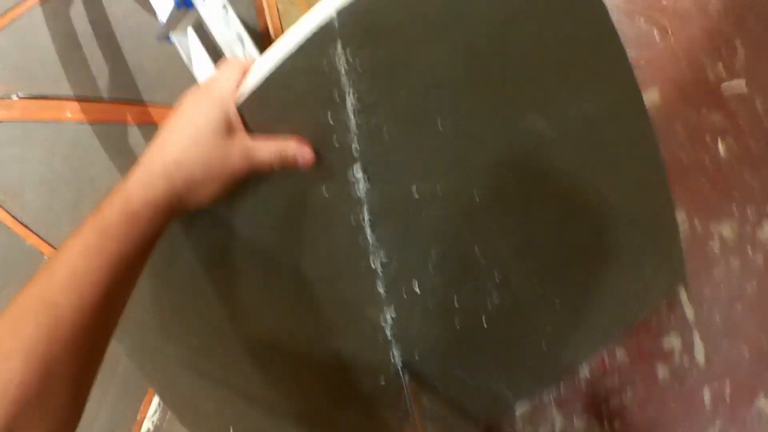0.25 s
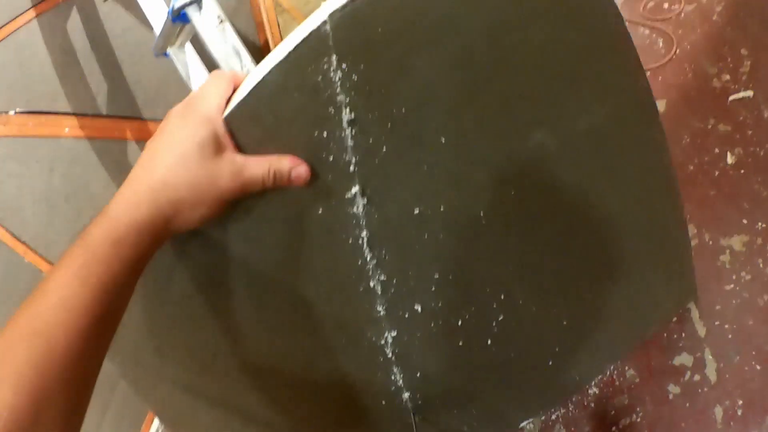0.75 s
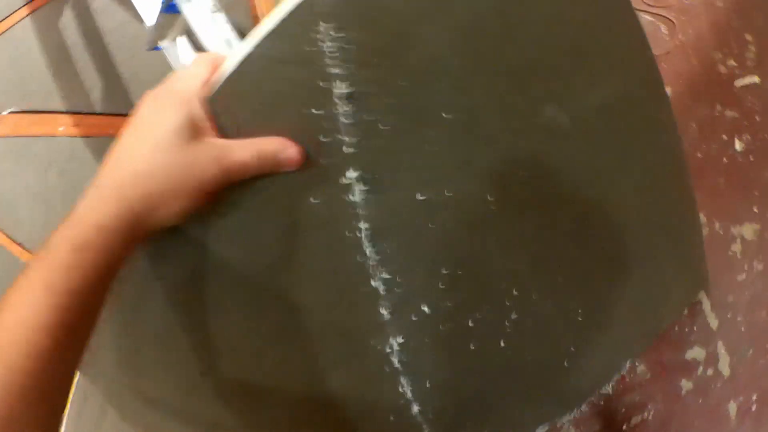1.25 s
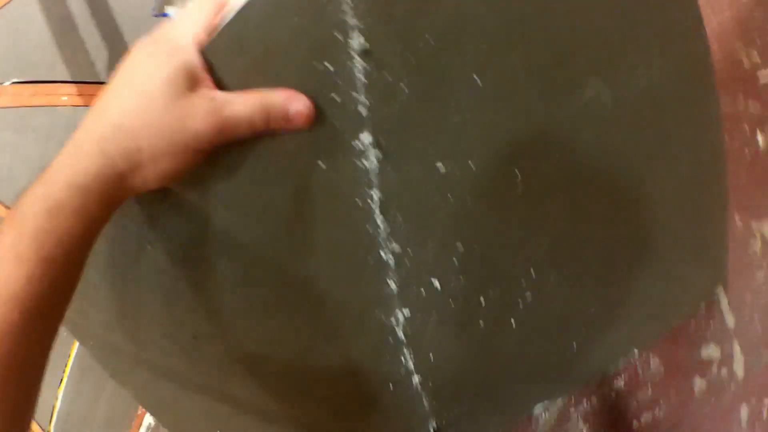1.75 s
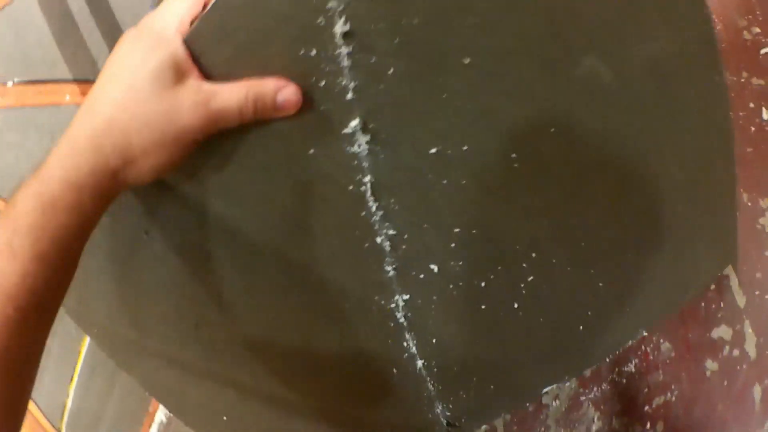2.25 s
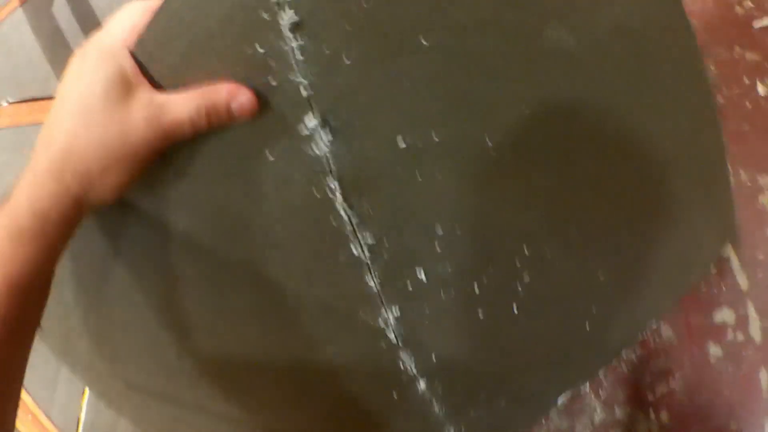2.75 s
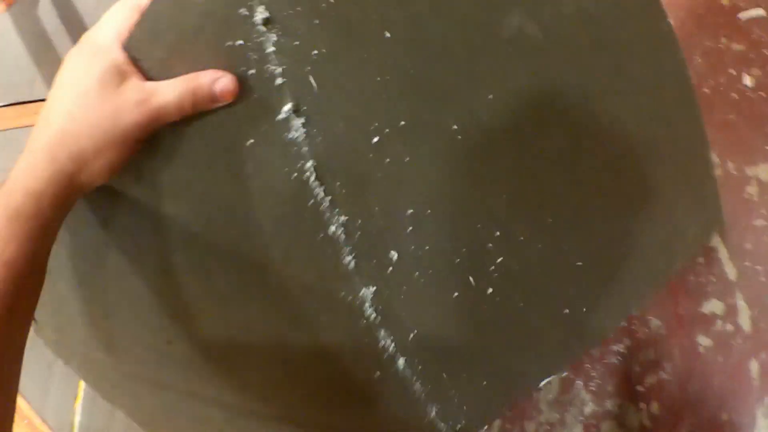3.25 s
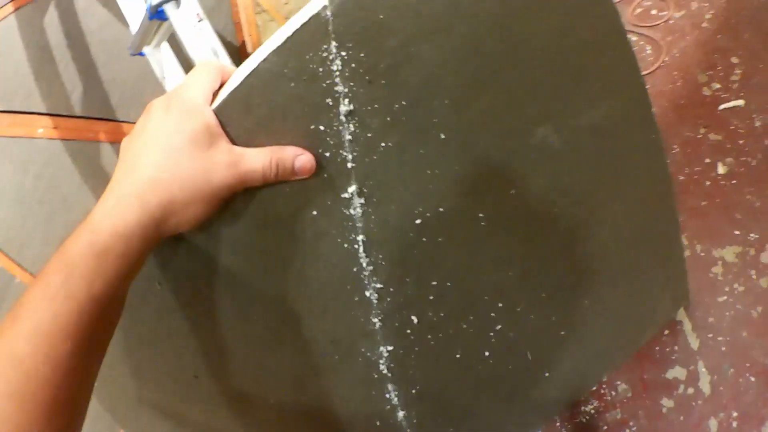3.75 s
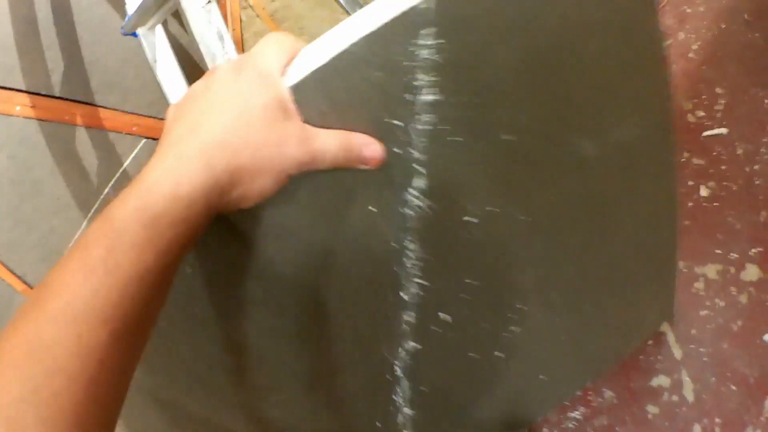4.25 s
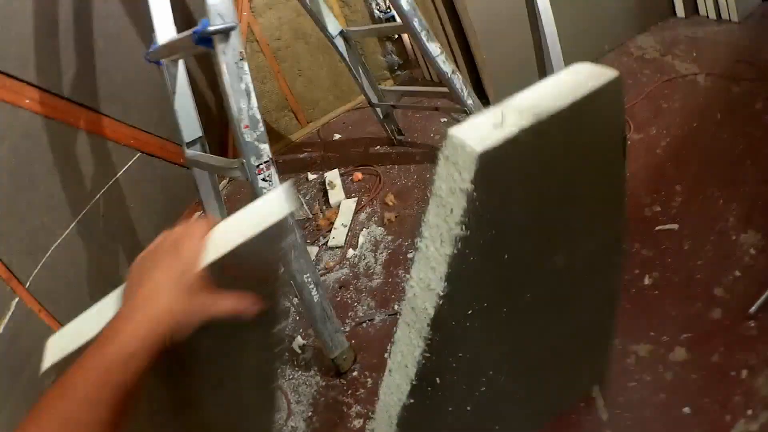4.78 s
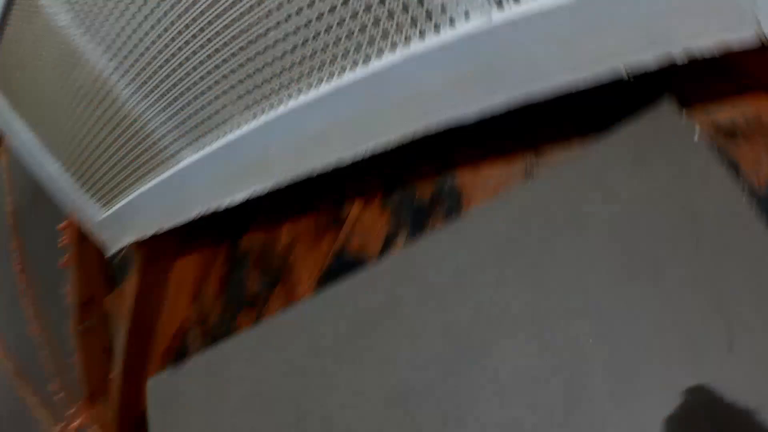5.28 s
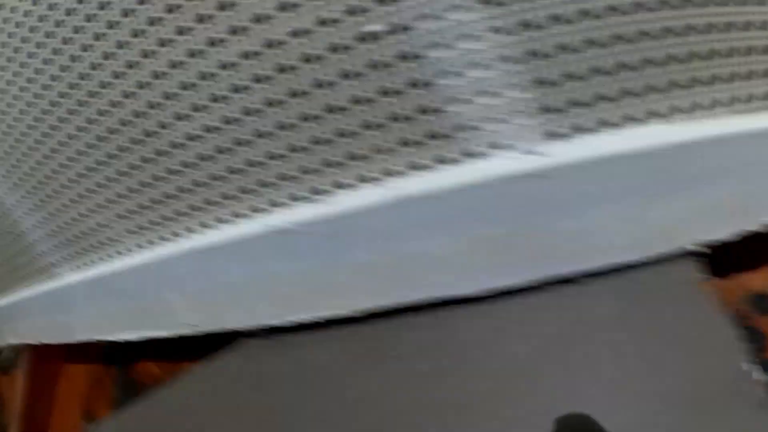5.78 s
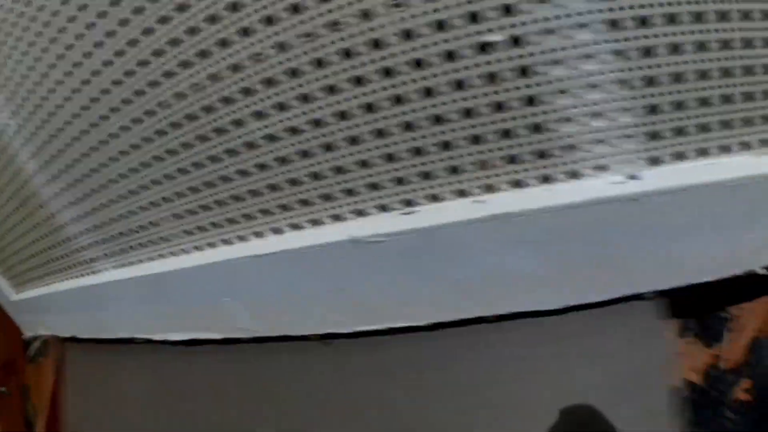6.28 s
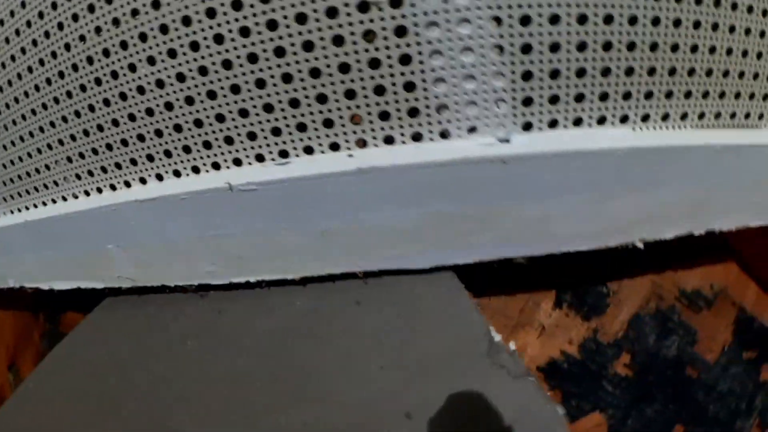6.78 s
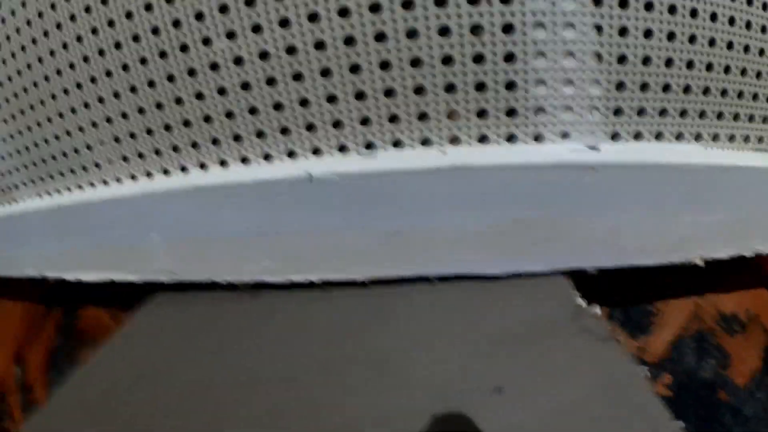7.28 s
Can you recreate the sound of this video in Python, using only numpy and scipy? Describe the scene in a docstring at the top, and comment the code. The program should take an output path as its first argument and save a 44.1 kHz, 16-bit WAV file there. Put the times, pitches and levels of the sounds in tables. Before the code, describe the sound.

A serrated blade saws quickly through rigid foam board, droning and squeaking, then a crack, a knife clattering down, and rough foam rasping over hum.

```python
"""A serrated knife saws through rigid foam board: the teeth crush cells, the sheet drones, the blade squeaks.
Sawing, parting and rasping are friction, as noise in three bands driven by hand speed and pressure.
Teeth add a periodic tone and squeaks are gliding sines; cracks of the board are bursts of dying noise.
The halves rub apart, the knife clatters on the floor as ringing modes, clink noise and thump noise.
Then foam is rasped in rough strokes of uneven length over a low mains hum, in a small hard workshop."""
import sys
import numpy as np
from scipy import signal
from scipy.fft import rfft, irfft, next_fast_len
from scipy.io import wavfile
from scipy.ndimage import uniform_filter1d

SR = 44100
rng = np.random.default_rng(int(sys.argv[2]) if len(sys.argv) > 2 else 0)


def bounce(signal):
    """Save signal as a 16-bit WAV file at the path given by the first command-line argument."""
    frames = np.transpose(np.atleast_2d(signal))
    limited = np.clip(frames, -1, 1)
    pcm = np.round(limited * 32767).astype(np.int16)
    wavfile.write(sys.argv[1], SR, pcm)


N = 331632
T = np.arange(N) / SR   # time of each sample [s]

# Saw strokes, push and pull in turn; levels are nominal, the tooth tone's at mid-stroke:
# (start [s], pressure peak [s], end [s], sheet drone [dB], rasp [dB], hiss [dB],
#  mid-stroke tooth rate [teeth/s], tooth tone [dB])
SAW_STROKES = [(-0.069, 0.06, 0.17, -24.5, -23, -29.5, 588.0, -22.0),
               (0.176, 0.332, 0.38, -27.5, -27.0, -28.5, 560.0, -33.5),
               (0.355, 0.44, 0.56, -24, -23.0, -30.5, 520, -19),
               (0.569, 0.733, 0.78, -32, -27.5, -30.5, 450.0, -44),
               (0.766, 0.826, 1.012, -23.5, -23, -27, 605, -25),
               (1.015, 1.084, 1.203, -32.5, -23.0, -24.0, 400.0, -44),
               (1.2, 1.304, 1.425, -26.0, -23.0, -24, 320.0, -32),
               (1.424, 1.566, 1.63, -32.5, -21.5, -25, 420, -45),
               (1.632, 1.735, 1.852, -23.5, -24.5, -29.5, 352, -24),
               (1.878, 2.038, 2.06, -25.5, -24, -27, 580, -42.0),
               (2.049, 2.114, 2.3, -22.5, -24.0, -29.5, 430.0, -28),
               (2.302, 2.443, 2.474, -36.0, -21.5, -27.5, 400.0, -46.5),
               (2.475, 2.529, 2.722, -27.5, -24, -26, 284, -41.5),
               (2.718, 2.745, 2.97, -35.0, -28, -26, 265, -46.0),
               (2.985, 3.106, 3.164, -26.5, -27.5, -30, 230, -31.5)]
# Response of drone, rasp and hiss, a row each: (power of the speed [-], rise under full pressure [dB])
SAW_RESPONSE = [(0.81, 10.5), (0.56, 7.5), (0.69, -3)]
# Spectrum of sawing: (frequency [Hz], relative density [dB per Hz])
SAW_SPECTRUM = [(30, -53), (70, -15.5), (120, -16), (182, 2), (225, -10), (305, -0.5), (490, -9.5),
                (630, -7), (760, -12), (1300, -11), (1800, -14.5), (2500, -7.5), (3300, -2), (4300, -8),
                (5800, -15), (7300, -4.5), (9000, -2.5), (13200, -27)]


def sawing():
    """Periodic forcing: each passing tooth crushes cells and plucks the sheet."""
    teeth, tone = blade_motion()
    unsteady_teeth = teeth * (1 + .06 * drift(300))
    phase = 2 * np.pi * np.cumsum(unsteady_teeth) / SR
    force = crumbling(grain_db=1.8, clump_db=1.3) * (1 + .2 * np.cos(phase))
    cut = rubbing(SAW_STROKES, SAW_RESPONSE, SAW_SPECTRUM, force, drone_db=0, rasp_db=.5, hiss_db=-1.23)
    # a short echo, randomly wandering in delay and strength, colours the cut
    delayed = T - .0011 * from_db(1.2 * drift(6))
    echo = np.array([np.interp(delayed, T, ear) for ear in cut])
    cut = cut + .35 * np.tanh(2 * drift(3)) * echo
    pluck_wave = np.sin(phase) + 0.17 * np.sin(2 * phase)
    pluck = tone * from_db(2.8 * drift(120)) * pluck_wave
    return cut + pluck * from_db([[-.8], [.8]])   # the pluck leans to the right


IDLE_TEETH_PER_S = 170


def blade_motion():
    """Kinematics: tooth rate follows the stroke's squared speed; the tone gain also favours early bite."""
    teeth, tone = np.full(N, float(IDLE_TEETH_PER_S)), np.zeros(N)
    for start, _, end, *_, top_rate, level_db in SAW_STROKES:
        span = slice(*np.searchsorted(T, [start, end]))
        bite = stroke_speed(T[span], start, end) ** 2
        teeth[span] += (top_rate - IDLE_TEETH_PER_S) * bite
        early = 2 * (end - T[span]) / (end - start)
        tone[span] += from_db(level_db) * bite * early
    return teeth, tone


def stroke_speed(t, start, end):
    """Reciprocating motion: the hand speeds up from rest and slows to rest again, 0-1."""
    arc = np.sin(np.pi * (t - start) / (end - start))
    return np.maximum(arc, 0) * (t > start) * (t < end)


TURN_S = .012   # the foam flexes, so a stroke takes hold and lets go gradually


def stroke_gains(strokes, law):
    """Friction law: drone, rasp and hiss grow with speed and answer a pressure that peaks and eases off."""
    power = np.zeros((3, N))
    for start, peak, end, *levels in strokes:
        span = slice(*np.searchsorted(T, [start, end]))
        speed = stroke_speed(T[span], start, end)
        slack = np.interp(T[span], [start, peak, end], [1, 0, 1])
        for k, (speed_power, pressure_db) in enumerate(law):
            gain = speed ** abs(speed_power) * from_db(levels[k] - pressure_db * slack)
            power[k, span] += gain ** 2
    return uniform_filter1d(np.sqrt(power), int(TURN_S * SR) + 1, axis=1)


def rubbing(strokes, law, spectrum, force, drone_db, rasp_db, hiss_db):
    """Friction noise: bursting cells shake the sheet (low), rasp in the cut (middle) and hiss (high)."""
    edges_hz = (40, 900, 5500, 20000)
    gains, trims_db = stroke_gains(strokes, law), (drone_db, rasp_db, hiss_db)
    bands = zip(edges_hz, edges_hz[1:])
    return sum(gain * from_db(trim_db) * coloured(spectrum, force, band)
               for gain, trim_db, band in zip(gains, trims_db, bands))


def crumbling(grain_db, clump_db):
    """Random fracture: foam cells give way one by one, and in clumps."""
    return from_db(grain_db * drift(2500) + clump_db * drift(130))


# The loudest squeaks of the blade; each ear's level varies a little:
# (start [s], end [s], start pitch [Hz], end pitch [Hz], nominal level [dB])
LOUD_SQUEAKS = [(.40, .436, 9800, 9850, -22), (.51, .555, 7500, 8370, -22.5), (.722, .762, 8300, 9330, -22),
                (1.05, 1.17, 10250, 9700, -26), (1.09, 1.175, 7150, 7300, -23),
                (1.28, 1.39, 9300, 8230, -26), (1.455, 1.50, 8300, 9200, -22),
                (1.66, 1.725, 10800, 11600, -24), (1.80, 1.84, 9200, 8200, -24.5),
                (1.92, 1.985, 11100, 12540, -30), (1.93, 1.99, 7400, 7730, -20),
                (2.60, 2.69, 6860, 7300, -19), (2.635, 2.68, 8330, 8590, -22.5),
                (2.765, 2.825, 6500, 8500, -20.5), (2.798, 2.829, 8780, 9120, -9.5),
                (2.825, 2.965, 8320, 8630, -19), (3.005, 3.06, 7470, 7560, -19.5),
                (3.015, 3.048, 8664, 8900, -17)]


def loud_squeaks():
    """Stick-slip vibration at its strongest: the listed glides of the blade."""
    return squeaks(LOUD_SQUEAKS, waver=.009, flutter_db=2.5)


def squeaks(rows, waver, flutter_db):
    """Stick-slip: steel alternately grips and slides on foam in short, unsteady glides."""
    out = np.zeros((2, N))
    wobble, flutter = 1 + waver * drift(1100), from_db(flutter_db * drift(250))
    for start, end, from_hz, to_hz, level_db in rows:
        span = slice(int(start * SR), int(end * SR))
        u = (T[span] - start) / (end - start)
        pitch = from_hz + (to_hz - from_hz) * np.sin(np.pi * u / 2)
        # each glide reaches the two ears with its own phase and strength
        phase = 2 * np.pi * np.cumsum(pitch * wobble[span]) / SR + rng.normal(0, .8, (2, 1))
        ear_gain = from_db(level_db + rng.normal(0, .8, (2, 1)))
        swell = np.sin(np.pi * u)
        out[:, span] += ear_gain * swell * flutter[span] * np.sin(phase)
    return out


SQUEAK_LOW_HZ, SQUEAK_HIGH_HZ = 6950, 12300   # pitch range at full speed
SQUEAK_S = 0.046   # typical length; each lasts 0.5 to 1.5 times this, at most half the stroke
SQUEAK_FOLLOWS = 0.15   # power of the speed that the pitch follows
SQUEAK_DB, SQUEAK_SPREAD_DB = 2.5, 6   # the strongest, over hiss plus half the spectrum; range below that


def stray_squeaks(count):
    """Speed-dependent stick-slip: rows of faint squeaks whose end pitches follow the blade's speed."""
    rows = []
    for start, _, end, _, _, hiss_db, *_ in SAW_STROKES:
        for when, length, pitch, weakness in rng.random((count, 4)):
            lasts = min(SQUEAK_S * (.5 + length), (end - start) / 2)
            onset = start + (end - start - lasts) * (.08 + .84 * when)
            times = np.array([onset, onset + lasts])
            full_speed_hz = SQUEAK_LOW_HZ * (SQUEAK_HIGH_HZ / SQUEAK_LOW_HZ) ** pitch
            hz = full_speed_hz * stroke_speed(times, start, end) ** SQUEAK_FOLLOWS
            level_db = hiss_db + SQUEAK_DB - SQUEAK_SPREAD_DB * weakness
            level_db += at_hz(SAW_SPECTRUM, hz.mean()) / 2
            rows.append((*times, *hz, level_db))
    return rows


# The cut faces rub apart, nominal levels:
# (start [s], pressure peak [s], end [s], sheet drone [dB], rasp [dB], hiss [dB])
PARTING_STROKES = [(3.206, 3.305, 3.335, -44, -28.5, -40.5), (3.345, 3.412, 3.464, -38.5, -35, -33.5),
                   (3.894, 3.925, 4.05, -44, -39, -36.5), (4.015, 4.151, 4.34, -39.5, -34, -39.5),
                   (4.311, 4.395, 4.456, -37, -29, -37), (4.414, 4.455, 4.58, -55, -46.5, -49),
                   (4.555, 4.63, 4.91, -59, -37, -36.5)]
# Response of drone, rasp and hiss, a row each: (power of the speed [-], rise under full pressure [dB])
PARTING_RESPONSE = [(0.58, 7.8), (0.44, 5), (0.47, 6.9)]
# Spectrum of parting: (frequency [Hz], relative density [dB per Hz])
PARTING_SPECTRUM = [(59, -45), (100, -19.5), (284, -4), (348, -12.5), (513, -8), (643, -17), (805, -8.5),
                    (1900, -10), (2860, 1), (5730, -8), (9160, 5.5), (13200, -21.5)]


def parting():
    """Sliding friction: the cut faces rub apart, foam on foam."""
    force = crumbling(grain_db=1.0, clump_db=1.2)
    return rubbing(PARTING_STROKES, PARTING_RESPONSE, PARTING_SPECTRUM, force,
                   drone_db=0.1, rasp_db=0.34, hiss_db=0.8)


# Rough rasping strokes as overlapping swells of friction, nominal levels:
# (start [s], pressure peak [s], end [s], sheet drone [dB], rasp [dB], hiss [dB])
RASPING_STROKES = [(5.354, 5.385, 5.436, -46.5, -31.5, -42), (5.40, 5.49, 5.56, -46, -34.5, -44),
                   (5.556, 5.595, 5.72, -30, -20.5, -25), (5.678, 5.732, 5.785, -29, -24, -28),
                   (5.749, 5.801, 5.905, -36, -37, -41), (5.925, 6.048, 6.108, -32, -24.5, -30.5),
                   (6.066, 6.085, 6.19, -25, -12.5, -25), (6.116, 6.311, 6.36, -33.5, -22.5, -28),
                   (6.401, 6.445, 6.57, -28.5, -15.5, -21.5), (6.49, 6.59, 6.80, -26, -14, -19.5),
                   (6.747, 6.87, 6.99, -32, -20, -26), (6.937, 7.088, 7.118, -30.5, -15.5, -25.5),
                   (7.222, 7.385, 7.463, -25.5, -10.5, -17.3), (7.494, 7.53, 7.62, -29, -14, -21)]
# Response of drone, rasp and hiss, a row each: (power of the speed [-], rise under full pressure [dB])
RASPING_RESPONSE = [(.41, 1.8), (.45, 8), (.59, 6.7)]
# Spectrum of rasping: (frequency [Hz], relative density [dB per Hz])
RASPING_SPECTRUM = [(60, -33), (120, -14.5), (200, -6), (300, -4.5), (600, -5.5), (1200, -6.5),
                    (2300, -3.5), (3300, -1), (4300, -3.5), (5900, -13), (7300, -5.5), (9000, -5.5),
                    (10400, -13), (14000, -37)]


def rasping():
    """Abrasive friction: foam is rasped in rough strokes of uneven length."""
    force = crumbling(grain_db=1.0, clump_db=1.0)
    return rubbing(RASPING_STROKES, RASPING_RESPONSE, RASPING_SPECTRUM, force,
                   drone_db=-0.4, rasp_db=0.38, hiss_db=1.1)


# Cracks and knocks of the board, and a small click at 5.318 s:
# (time [s], burst level before dulling [dB], dulling cutoff [Hz], thump level [dB])
CRACKS_AND_CLICK = [(3.118, 1.5, 8500, -22), (3.477, -15, 2530, -49), (4.199, -23, 3970, -33.5),
                    (4.4, -20, 4070, -58), (4.868, -22, 2488, -53), (5.318, -29, 6030, -40),
                    (6.078, -7, 8000, -20), (6.971, -10, 9000, -46)]
# Spectrum of the bursts: (frequency [Hz], relative density [dB per Hz])
CRACK_SPECTRUM = [(30, -40), (120, -30), (400, -14), (800, -0.5), (1500, -2), (2800, 2), (4200, -3),
                  (5800, -21.5), (8000, 3), (14000, -18.5)]


def cracks_and_click(crack_t60, thump_t60, tail_db, tail_t60):
    """Impulsive excitation: each row is a short noise burst, a low thump and a duller, lingering wash."""
    burst = coloured(CRACK_SPECTRUM)
    thump = coloured([(30, -17), (170, 4), (350, 3), (900, -33), (4000, -64)], band=(70, SR))
    wash = from_db(tail_db) * lowpass(coloured(CRACK_SPECTRUM), 4200)
    out = np.zeros((2, N))
    for s, level_db, dull_hz, thump_db in CRACKS_AND_CLICK:
        noise = burst * dying(s, crack_t60) + wash * dying(s, tail_t60)
        out += from_db(level_db) * lowpass(noise, dull_hz)
        out += from_db(thump_db) * thump * dying(s, thump_t60)
    return out


# The loose half knocks against something hard: (time [s], level [dB], brightness [dB])
KNOCKS = [(3.477, -22.5, 3.3), (3.488, -27, -3)]
# Its ring: (frequency [Hz], relative level [dB], 60 dB decay time [s])
KNOCK_RING = [(570, 1, .06), (813, -2, .05), (1276, -6, .05), (2143, -4, .07), (3000, -10, .05),
              (4150, -7, .04), (1480, -14, .3)]


def knocking():
    """Modal excitation: the loose half of the board rings as it knocks against something hard."""
    return struck(KNOCKS, KNOCK_RING, spread_db=3.0)


# The knife bounces on the floor: (time [s], relative strength [dB], brightness [dB])
KNIFE_BOUNCES = [(4.906, -12.5, 5), (4.94, -6.5, -5), (4.95, -8, -4), (4.981, -19.5, -11),
                 (5.0287, -26, -1), (5.051, -16, 5), (5.0593, -14, 5), (5.1221, -21, 1), (5.1982, -27, -1),
                 (5.224, -28, -4.5)]
# Ring of the blade: (frequency [Hz], relative level [dB], 60 dB decay time [s])
BLADE_RING = [(1440, -22, .22), (2121, -22, .3), (2454, -1, .13), (2646, -7, .2), (2830, -11, .06),
              (3010, -8, .1), (3215, -8, .25), (3540, -5, .14), (3700, -9, .26), (3952, -8, .1),
              (4110, -6, .18), (4630, -16, .12), (5080, -17, .1), (6650, -22, .07), (7600, -26, .07),
              (8290, -24, .07)]
# Spectrum of the clink: (frequency [Hz], relative density [dB per Hz])
CLINK_SPECTRUM = [(300, -46), (1200, -14.5), (2000, -8.5), (2700, 3.5), (4200, 0.5), (6000, -7), (9500, -8),
                  (14000, -39)]


def dropped_knife(ring_db, clink_db, thump_db, clink_t60, thump_t60):
    """Nonlinear impact: ring grows with the strength of a bounce, clink with its square, thump its cube."""
    hardness = [(s, from_db(strength_db)) for s, strength_db, _ in KNIFE_BOUNCES]
    clink_envelope = sum(hard ** 2 * dying(s, clink_t60) for s, hard in hardness)
    clink = coloured(CLINK_SPECTRUM) * clink_envelope
    thump_envelope = sum(hard ** 3 * dying(s, thump_t60) for s, hard in hardness)
    thump = coloured([(30, 8), (500, 2), (1200, -9), (4000, -42)]) * thump_envelope
    ring = struck(KNIFE_BOUNCES, BLADE_RING, spread_db=3.5)
    return from_db(clink_db) * clink + from_db(thump_db) * thump + from_db(ring_db) * ring


def struck(hits, modes, spread_db):
    """Modal synthesis: every hit rings every mode; a bright hit favours those above 3 kHz."""
    s, hit_db, bright_db = np.transpose(hits)[:3]
    out = np.zeros((2, N))
    for k, (hz, level_db, t60) in enumerate(modes):
        tilt = bright_db * np.tanh(4 * np.log2(hz / 3000))
        chance_db = spread_db * rng.standard_normal((len(s), 2)).T
        clicks = np.zeros((2, N))
        clicks[:, np.round(s * SR).astype(int)] = from_db(hit_db + level_db + tilt + chance_db)
        r, w = np.exp(-np.log(1000) / (t60 * SR)), 2 * np.pi * hz / SR   # pole radius and angle
        ring = signal.lfilter([0, np.sin(w)], [1, -2 * r * np.cos(w), r * r], clicks + 1e-18)
        out += (-1) ** k * ring   # neighbouring modes start in opposite directions
    return out


def room(x, t60, wall_hz):
    """Diffuse reverberation: convolution with a decaying noise tail, dulled by the walls."""
    noise = coloured([(60, -21), (200, 7.5), (9000, 10.5)])
    tail = lowpass(noise * dying(0.0023, t60), wall_hz)[:, :SR]
    unit_tail = tail / np.sqrt(np.sum(tail ** 2) / 2)
    return signal.fftconvolve(x, unit_tail, axes=1)[:, :N]


# Spectrum of the room air: (frequency [Hz], relative density [dB per Hz])
AIR_SPECTRUM = [(25, -22.5), (100, -5), (220, -5), (400, -9.5), (900, -4), (2500, -14), (3800, -13),
                (5500, -28), (9000, -19), (14000, -49)]
# Spectrum of the later rumble: (frequency [Hz], relative density [dB per Hz])
RUMBLE_SPECTRUM = [(20, 9), (45, -4.5), (90, 10), (200, 12.5), (500, -45), (2000, -24)]
# Mains hum, nominal rms: (frequency [Hz], level at first [dB], level later [dB])
MAINS_HUM = [(59, -88, -49.5), (232.6, -61, -55)]
HUM_STEP_S, RUMBLE_RISE_S = 5.316, .3   # the hum steps to its later level; the rumble swells from half


def background(air_db, rumble_db):
    """Stationary noise and tones: room air and mains hum, joined later by a low rumble that swells in."""
    later = np.clip((T - HUM_STEP_S) * 100, 0, 1)
    swell = later * np.interp(T - HUM_STEP_S, [0, RUMBLE_RISE_S], [.5, 1])
    hum = np.zeros(N)
    for hz, first_db, later_db in MAINS_HUM:
        gain = from_db(first_db + (later_db - first_db) * later + drift(11.0))
        hum += gain * np.sqrt(2) * np.sin(2 * np.pi * hz * T + 0.24 * drift(7.2))
    air = from_db(air_db) * coloured(AIR_SPECTRUM)
    return hum + air + from_db(rumble_db) * swell * coloured(RUMBLE_SPECTRUM)


# Likeness of the two ears: (frequency [Hz], correlation [-])
EAR_LIKENESS = [(60, 0.96), (130, 0.98), (280, 1), (600, 0.98), (1280, 0.91), (2760, 0.9), (5950, 0.62),
                (12800, 0.18)]
# Balance of the two ears: (frequency [Hz], left minus right [dB])
EAR_BALANCE = [(60, -1), (250, -1.4), (500, -1.4), (1000, -1), (4000, -0.6), (8000, 0.3), (12000, -2.5)]


def coloured(spectrum, force=1., band=(10, SR)):
    """Spectral shaping: stereo noise under a force envelope, in a soft-edged band [Hz]; rms 1."""
    size = next_fast_len(N)
    hz = np.arange(size // 2 + 1) * SR / size
    mid, side = rfft(rng.standard_normal((2, N)) * force, size)
    alike, ears = np.clip(at_hz(EAR_LIKENESS, hz), 0, .995), np.array([[1], [-1]])
    pair = np.sqrt(1 + alike) * mid + np.sqrt(1 - alike) * side * ears
    pair = pair * from_db(at_hz(EAR_BALANCE, hz) * ears / 2)
    edges = ((1 + (band[0] / (hz + 1)) ** 8) * (1 + (hz / band[1]) ** 8)) ** -.5
    return rms_one(irfft(pair * from_db(at_hz(spectrum, hz)) * edges, size)[:, :N])


def at_hz(points, hz):
    """Logarithmic pitch scale: read a spectrum on a log-frequency axis."""
    f, value = np.transpose(points)
    return np.interp(np.log(hz + 1), np.log(f), value)


def drift(rate):
    """Random modulation: smooth chance of rms 1 that changes rate times a second."""
    return rms_one(np.interp(T * rate, np.arange(60000), rng.standard_normal(60000)))


def dying(s, t60):
    """Exponential decay: an envelope that jumps to 1 and falls 60 dB in t60 seconds."""
    return (T >= s) * from_db(-60 * np.clip((T - s) / t60, 0, 3))


def lowpass(x, hz):
    """Absorption of the treble: a gentle causal second-order low-pass."""
    return signal.sosfilt(signal.butter(2, min(hz, .45 * SR), fs=SR, output="sos"), x + 1e-18)


def from_db(db):
    """Decibel law: level to amplitude gain."""
    return 10 ** (np.asarray(db) / 20)


def rms_one(x):
    """Power normalisation: scale to unit power."""
    return x / np.sqrt(np.mean(x ** 2) + 1e-20)


def scene():
    """Superposition: all the work happens close by, in a small hard room."""
    foam = sawing() + loud_squeaks()
    foam += squeaks(stray_squeaks(count=9), waver=.008, flutter_db=3)
    foam += parting()
    rasp = rasping()
    blows = cracks_and_click(crack_t60=0.031, thump_t60=0.1, tail_db=-19.5, tail_t60=0.46) + knocking()
    knife = dropped_knife(ring_db=-8.0, clink_db=11, thump_db=-6.0, clink_t60=0.052, thump_t60=0.024)
    sent = from_db(-14) * (foam + rasp) + from_db(-13) * knife
    echo = room(sent, t60=.5, wall_hz=6000)
    return foam + rasp + blows + knife + echo + background(air_db=-52.5, rumble_db=-43.5)


CUTOFF_HZ = 14500


def record(dry):
    """Band limiting and overload: a narrow treble notch, clipping at full scale, then a steep low-pass."""
    notched = signal.lfilter(*signal.iirnotch(7900, 45, fs=SR), dry)
    clipped = np.clip(notched, -1, 1)
    return signal.sosfilt(signal.cheby1(8, .3, CUTOFF_HZ, fs=SR, output="sos"), clipped)


dry = scene()
out = record(dry)
bounce(out)
```